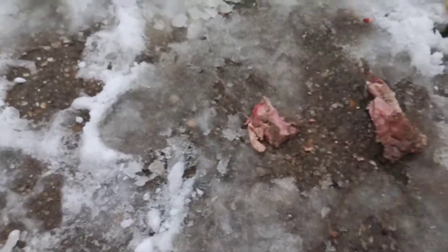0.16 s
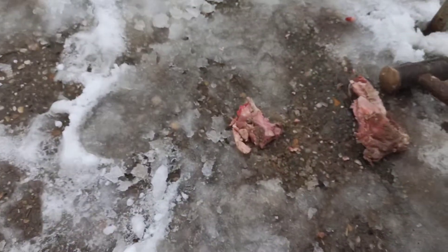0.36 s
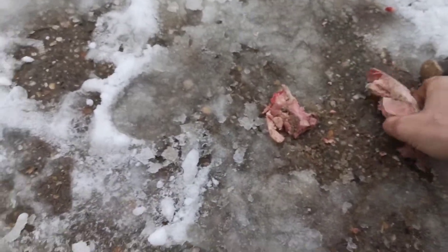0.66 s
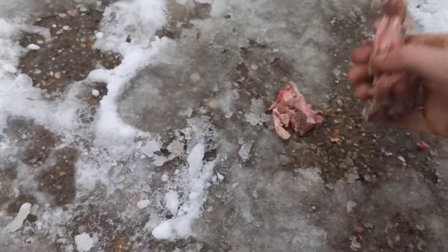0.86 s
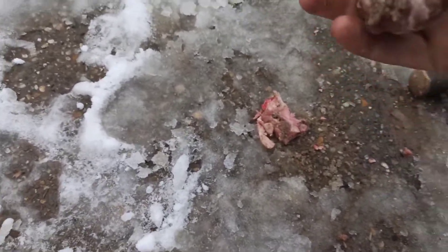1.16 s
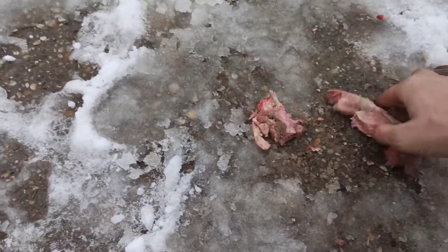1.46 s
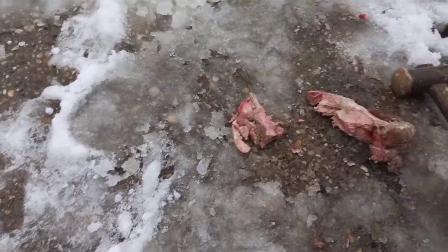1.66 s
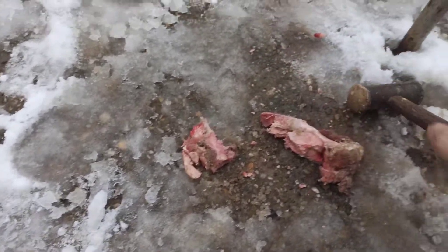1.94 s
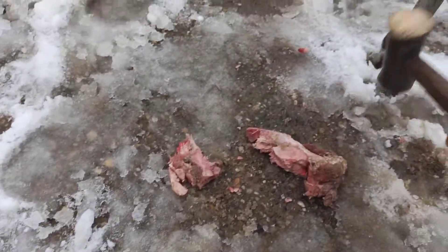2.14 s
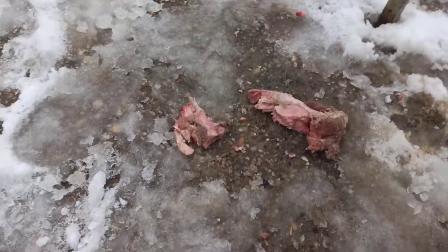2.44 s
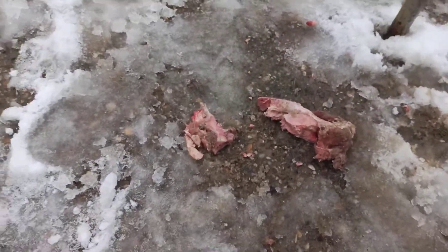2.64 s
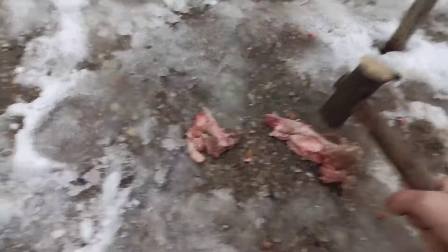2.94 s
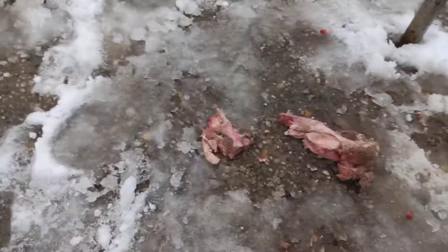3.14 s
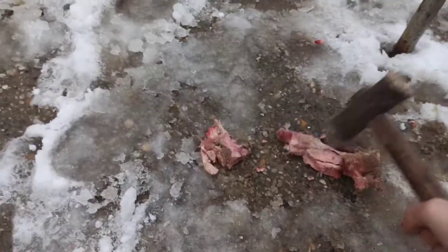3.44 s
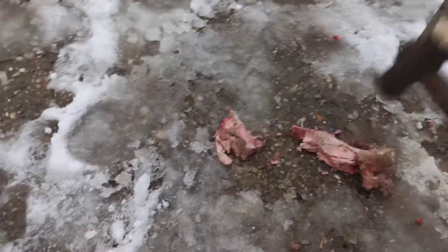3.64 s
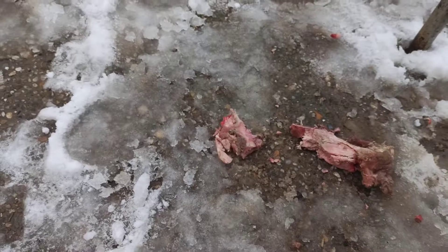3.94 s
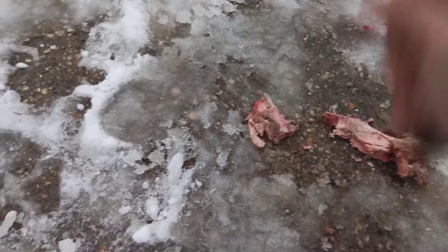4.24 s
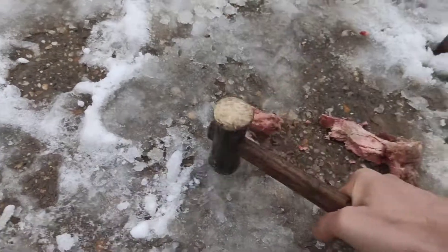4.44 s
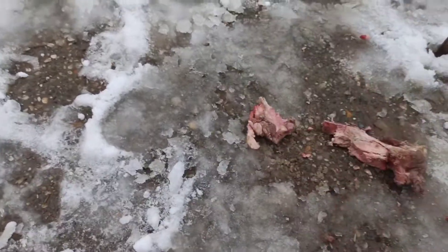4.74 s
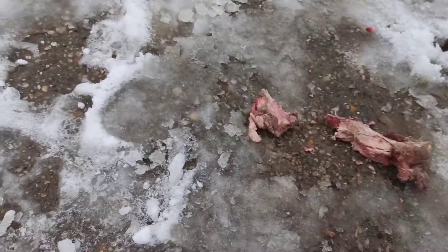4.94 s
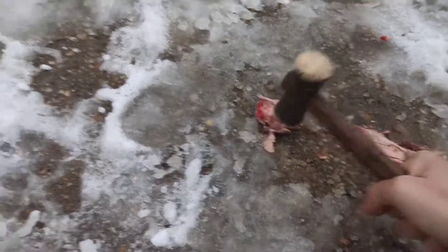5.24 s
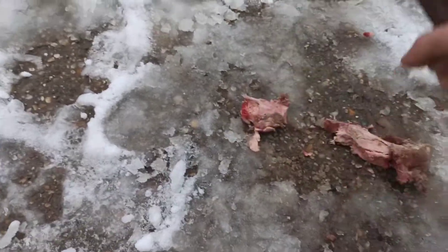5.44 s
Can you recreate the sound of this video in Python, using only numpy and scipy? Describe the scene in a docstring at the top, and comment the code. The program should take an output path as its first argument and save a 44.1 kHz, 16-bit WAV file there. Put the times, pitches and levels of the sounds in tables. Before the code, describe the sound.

Close, in a quiet open yard, a hammer is set down with a short hollow clatter on gritty ice. Light scrapes, grain ticks and cloth rustle follow as a bone is shifted. Then come four evenly spaced heavy blows, each a sharp bony crack over a low thump, with small knocks and sleeve swishes between. The microphone is near, with handling rumble and overloaded peaks.

```python
"""Meaty bones are broken with a heavy hammer on icy, gritty ground in a quiet yard.
First the hammer is put down with a clatter, made of short ringing tones, and a bone is turned over.
Then four close blows follow: noise bursts ring the bone, low swings thump the ground, loud peaks overload.
Between blows come small knocks of the resting hammer and scapes of grit, made of crackling noise.
Throughout, a sleeve swishes and handling rumbles, both shaped noise; a few faint tones sound far off."""
import sys
import numpy as np
from scipy import signal
from scipy.fft import rfft, irfft
from scipy.io import wavfile

SR = 44100
rng = np.random.default_rng(int(sys.argv[2]) if len(sys.argv) > 2 else 0)


def generate_wav(signal):
    """Clip the signal to [-1, 1] and save it as 16-bit WAV at the path in sys.argv[1]."""
    frames = np.transpose(np.atleast_2d(signal))
    scaled = np.clip(frames, -1, 1) * 32767
    pcm = np.round(scaled).astype(np.int16)
    wavfile.write(sys.argv[1], SR, pcm)


N = 246519   # length in samples
TIME = np.arange(N) / SR   # seconds from the start
AGE = np.arange(SR // 5) / SR   # seconds since a contact

# Hammer blows: start_s, crack_db, crush_s (time spent crushing), piece main_hz, piece second_hz, piece_db,
# ground thump_db, flesh slap_db, slap_hz, hammer head clack_db, clack_hz, flying crumbs_db, lifting sleeve_db
HAMMER_BLOWS = [(2.7843, -10, .0026, 3210, 6800, 2, -5, -12, 401, -11.5, 636, -55, -49.5),
                (3.438, -7, 0.0041, 2330, 6920, -4.5, -4.5, -15.5, 402, -40, 1018, -45.5, -53),
                (4.3346, -11.5, 0.0017, 4510, 6100, 0.5, -7.5, -17.5, 377, -11, 803, -59, -48.5),
                (5.0689, -6.5, 0.0028, 4360, 3530, 1.5, -7.5, -57, 295, -17, 900, -39.5, -49)]
# Notes that a cracking bone rings with: pitch_hz, width_hz, level_db
BONE_MODES = [(900, 180, 2), (1374, 200, 1.5), (1710, 250, -2.5), (2417, 350, 4.5), (2850, 140, -14),
              (3324, 300, 3), (3940, 480, -3), (4695, 170, 2), (5343, 190, -22), (5870, 200, -4.5),
              (6430, 270, 0), (7626, 120, 4.5), (13500, 3100, -39)]
# Knocks of hammer and bone on the ground: start_s, ring_db, ring_hz, thud_db (before a 4.5 dB cut),
# tick_db, wooden handle_db
GROUND_KNOCKS = [(0.2984, -27, 950, -19, -13.5, -32), (.309, -26.5, 1660, -42, -13, -35),
                 (0.3163, -1, 1054, -14, -17.5, -27), (0.3975, -37, 660, -30.5, -45, -60),
                 (0.4663, -9.5, 1200, -39.5, -17.5, -59), (0.7743, -43, 900, -38.5, -44, -56),
                 (1.1452, -31.5, 690, -33.5, -32.5, -36.5), (1.195, -33.5, 323, -36, -28, -43),
                 (1.2432, -24.5, 349, -60, -33.5, -45), (1.5403, -39, 348, -36.5, -44.5, -68),
                 (1.674, -48, 580, -42, -41.5, -43), (1.777, -40.5, 586, -42.5, -45.5, -39.5),
                 (1.9721, -23.5, 1105, -32.5, -35, -42), (3.0719, -40, 587, -58, -44, -46),
                 (3.2883, -18, 606, -39, -36, -21.5), (3.544, -33.5, 542, -33.5, -39.5, -36.5),
                 (4.0364, -34.5, 539, -52.5, -51.5, -70.5), (4.1365, -39, 479, -54, -57.5, -70),
                 (4.4454, -21, 352, -60, -30, -21), (4.9895, -40.5, 510, -49, -60, -52),
                 (5.452, -29, 310, -69, -35.5, -21)]
# Notes that a knocked piece rings with: multiple of the ring pitch (no unit), level_db
HOLLOW_MODES = [(.58, -5.5), (.8, -2), (1, 5), (1.3, -5), (1.75, -3.5), (2.5, -20)]
# Snaps of grit and ice: start_s, level_db (peak, before a 5 dB lift), centre_hz
GRAIN_SNAPS = [(0.0633, -36, 7100), (0.3076, -9, 5950), (.4685, -23.5, 13000), (0.627, -27, 2700),
               (.7527, -37, 5800), (1.0495, -29, 2400), (1.0545, -39, 3000), (1.0854, -25.5, 2720),
               (1.094, -39, 2940), (1.481, -29, 6940), (1.685, -26.5, 2500), (1.7036, -25.5, 6160),
               (1.719, -38.5, 3860), (2.0155, -26.5, 8000), (3.003, -37, 9050), (3.419, -30, 8980),
               (3.889, -39, 6840), (4.634, -27.5, 5500), (5.136, -29, 2980), (5.155, -37, 5000),
               (5.292, -27.5, 12400)]
# Scrapes over the gritty ice: start_s, length_s, level_db, centre_hz
ICE_SCRAPES = [(.336, .013, -35.5, 6500), (0.347, 0.024, -47, 1510), (0.469, .02, -39.5, 2480),
               (0.723, 0.024, -58.5, 800), (0.778, 0.019, -45.5, 786), (1.08, 0.022, -45, 1050),
               (1.202, 0.082, -53, 900), (1.41, 0.082, -48.5, 603), (1.682, .03, -52.5, 1000),
               (1.694, 0.052, -39, 5840), (1.887, 0.12, -50, 6500), (1.957, 0.023, -36.5, 920),
               (1.984, 0.047, -43, 6030), (2.006, .033, -36.5, 7000), (2.283, 0.013, -44, 746),
               (2.732, 0.02, -45, 500), (3.299, .041, -48.5, 650), (3.889, .015, -51.5, 591),
               (4.18, 0.036, -51, 665), (5.387, 0.014, -53.5, 900)]
# Single echoes from walls and fences: delay_s, level_db, favoured pitch_hz
WALL_ECHOES = [(.022, -18.5, 325.6), (.036, -18.5, 399), (.059, -20, 312), (.102, -29.5, 159.3),
               (.125, -41.5, 145), (.205, -28.5, 133)]
# Reaches of the arm, each a smooth swell of the sleeve: fastest_s (moment of the peak), width_s, level_db
ARM_REACHES = [(0.219, 0.39, -50.5), (.56, 0.03, -59), (.79, 0.017, -67), (1.4, 0.16, -53.5),
               (2.2, 0.092, -45), (2.51, 0.036, -49.5), (3.081, 0.069, -59), (3.35, 0.12, -53.5),
               (4.8, 0.1, -56.5), (5.44, 0.12, -54.5)]
# Soft low bumps and rubs of handling: start_s, length_s, level_db, start pitch_hz
HANDLING_RUBS = [(1.085, 0.093, -43.5, 123.6), (1.51, .075, -44.5, 143), (1.665, 0.0234, -39.5, 200),
                 (1.732, 0.072, -41.5, 118), (3.902, .031, -40, 135), (4.214, 0.022, -39, 153),
                 (4.872, .1, -40.5, 135.6), (4.98, 0.057, -43.5, 123.3)]
# Faint far-off tones: start_s, length_s, level_db, start pitch_hz, end pitch_hz
FAR_TONES = [(.005, 0.16, -69, 324, 317), (.38, 0.13, -51, 477, 465), (.46, 0.35, -55, 320.5, 311.7),
             (2.14, 0.17, -50.5, 332.5, 281)]
# Colour of dragged or scattered grit: pitch_hz, level_db
GRIT_COLOUR = [(60, -10), (200, 15), (700, 3.5), (1500, -1), (2500, -8), (4200, -8.5), (5400, -8),
               (7000, -3.5), (12000, -15.5), (16000, -11)]
# Colour of the swishing cloth and the hiss before a blow: pitch_hz, level_db
SLEEVE_COLOUR = [(500, 0.5), (1200, -4), (2400, -2), (3300, -2.5), (4500, 3.5), (5400, -13.5), (6400, 2),
                 (7500, 2), (8500, -13.5), (12000, -12), (16000, -6)]
# Colour of the handling rumble and the buffeted air: pitch_hz, level_db
RUMBLE_COLOUR = [(25, -28.5), (50, 0.5), (100, 1), (170, -3), (330, -5), (560, -3.5), (900, -16),
                 (1400, -14.5), (2500, -18), (6000, -46)]
# Colour of the soft echo tail: pitch_hz, level_db
ECHO_COLOUR = [(40, -14), (100, 2.5), (170, -4.5), (270, -12), (370, -10), (550, -13.5), (900, -21.5),
               (3000, -7.5), (7000, -12), (16000, -21)]
# How alike noise is on the two sides: pitch_hz, correlation (1 the same, -1 opposite; no unit)
SIDE_LIKENESS = [(60, -0.36), (300, 0.89), (640, 0.1), (1400, -0.13), (3000, 0.0077), (16000, -0.2)]


def blows():
    """A short soft hiss swells up to each blow; it crushes bone and thumps the ground, then crumbs fly."""
    hiss_db, hiss_s = -26, 0.011   # level of the hiss and how fast it swells
    gust_db, gust_width_s = -11, 0.0098   # air pushed aside by the head; level relative to the thump
    crumbs_after_s, crumbs_fly_s, crumbs_ring_db = 0.011, 0.1, -11.5   # ring relative to the crumbs
    late_s = [0.0026, 0.0028]   # the left port hears the ground first
    out = np.zeros((2, N))
    for (s, crack_db, crush_s, main_hz, second_hz, piece_db, thump_db,
         slap_db, slap_hz, clack_db, clack_hz, crumbs_db, _) in HAMMER_BLOWS:
        # the hiss is loudest at the blow
        hiss = noise(SLEEVE_COLOUR, len(AGE)) * np.exp(-AGE[::-1] / hiss_s)
        add(out, s - AGE[-1], from_db(hiss_db) * hiss)

        gust_shape = np.exp(-0.5 * ((AGE - AGE.mean()) / gust_width_s) ** 2)
        gust = noise(RUMBLE_COLOUR, len(AGE), centre_hz=30.2, spread=0.65) * gust_shape
        add(out, s - AGE.mean(), from_db(thump_db + gust_db) * gust)

        crushing = crushing_shape(crush_s)
        piece = broken_piece(crushing, main_hz, second_hz)
        crack = fracture(crushing, dry_db=-3) + from_db(piece_db) * piece
        add(out, s, from_db(crack_db) * crack)

        ground = thump(190, 0.00215, late_s) + from_db(-5.5) * thump(261, 0.0024, late_s)
        slap = thump(slap_hz, 0.0036, late_s)
        clack = thump(clack_hz, 0.001, [0.0004, 0.0005])
        add(out, s, from_db(thump_db) * ground + from_db(slap_db) * slap + from_db(clack_db) * clack)

        # the shower of crumbs rings like the piece it came from
        crumbs = from_db(crumbs_db) * crackle(crumbs_fly_s, main_hz) * flutter(340, 5.6, len(AGE))
        crumbs_ring = from_db(crumbs_ring_db) * resonate(crumbs, main_hz, 1200)
        add(out, s + crumbs_after_s, crumbs + crumbs_ring)
    return out


def crushing_shape(crush_s):
    """The crack builds up, holds while the bone is crushed, then falls away over a weaker, slower fade."""
    build_up = 1 - np.exp(-AGE / 0.0013)
    release = np.minimum(1, np.exp(-(AGE - crush_s) / 0.0017))
    return build_up * release + from_db(-4) * fade(0.025)


def broken_piece(crushing, main_hz, second_hz):
    """The piece that breaks off rings with two modes of its own."""
    breaks = rng.standard_normal((2, len(AGE))) * crushing
    main = carrying(resonate(breaks, main_hz, 460), crushing)
    second = carrying(resonate(breaks, second_hz, 470), crushing)
    return main + from_db(-9.5) * second


def fracture(envelope, dry_db):
    """A burst of tiny breaks rings the bone; each mode takes energy in proportion to its width."""
    breaks = rng.standard_normal((2, len(AGE))) * envelope

    def mode(hz, width_hz):
        """One ringing note of the bone; a wider one takes more energy."""
        return np.sqrt(width_hz) * rms_one(resonate(breaks, hz, width_hz))

    rung = np.zeros((2, len(AGE)))
    for k, (hz, width_hz, db) in enumerate(BONE_MODES):
        rung += (-1) ** k * from_db(db) * mode(hz, width_hz)   # neighbours have opposite signs
    dry_crunch = from_db(dry_db) * mode(1600, 3800)   # so wide that it hardly rings
    return carrying(rung + dry_crunch, envelope)


def thump(hz, swell_s, late_s):
    """Something struck gives under a load and swings back, dying away quickly."""
    t = np.maximum(AGE - np.array(late_s)[:, None], 0)
    swell = t / swell_s * np.exp(1 - t / swell_s)   # reaches 1 after swell_s
    return np.sin(2 * np.pi * hz * t) * swell


def knocks():
    """Each contact has a gritty tick, a short hollow ring, a thud and the handle's note; the right leads."""
    left_late_s, late_slope = 0.00031, 0.35   # lag of the left at 1 kHz; power by which it grows in the bass
    ring_cycles = 15.35   # cycles to fall by 60 dB, so low knocks ring longer
    handle_hz, handle_t60_s, tick_t60_s = 888, 0.041, 0.031
    out = np.zeros((2, N))
    for s, ring_db, ring_hz, thud_db, tick_db, handle_db in GROUND_KNOCKS:
        late_s = left_late_s * (1000 / ring_hz) ** late_slope
        t = np.maximum(AGE - np.array([[late_s], [0]]), 0)

        hollow = np.zeros((2, len(AGE)))
        for k, (multiple, db) in enumerate(HOLLOW_MODES):
            hollow += (-1) ** k * from_db(db) * np.sin(2 * np.pi * ring_hz * multiple * t)
        ring = from_db(ring_db) * hollow * fade(ring_cycles / ring_hz)
        handle = from_db(handle_db) * np.sin(2 * np.pi * handle_hz * t) * fade(handle_t60_s)
        ringing = (ring + handle) * (1 - np.exp(-t / 0.00046))   # soften the very start

        thud = thump(210, 0.0029, [late_s, 0]) + from_db(3) * thump(449, 0.0014, [late_s, 0])
        tick = fracture(fade(tick_t60_s), dry_db=-5.5)
        add(out, s, ringing + from_db(thud_db - 4.5) * thud + from_db(tick_db) * tick)
    return out


def grit():
    """Single grains snap as short ringing bursts; hammer and bone scrape over the ice."""
    out = np.zeros((2, N))
    for s, db, hz in GRAIN_SNAPS:
        burst = rng.standard_normal((2, len(AGE))) * (fade(0.0058) + from_db(-20.5) * fade(0.046))
        snap = resonate(resonate(burst, hz, 0.84 * hz), hz, 0.84 * hz)
        add(out, s, from_db(db + 5) * snap / np.abs(snap).max())
    for s, length_s, db, centre_hz in ICE_SCRAPES:
        add(out, s, from_db(db) * crackle(length_s, centre_hz))
    return out


def crackle(length_s, centre_hz):
    """Dragged or scattered grains crackle in clumps: quick attack, hold, release."""
    attack = np.clip(AGE / 0.0013, 0, 1)
    release = np.minimum(1, np.exp(-(AGE / length_s - 0.75) / 0.33))
    spread_octaves = 0.96 * (centre_hz / 1000) ** 0.26   # brighter scrapes are wider
    grains = noise(GRIT_COLOUR, len(AGE), centre_hz, spread_octaves)
    clumps = flutter(900, 3.2, len(AGE)) * flutter(120, 2.8, len(AGE))
    return attack * release * grains * clumps


def yard(x):
    """Walls and fences send back a few dull echoes inside a soft tail."""
    source = x.mean(axis=0)
    t = TIME[:SR // 2]
    decay = np.exp(-t / 0.04) + from_db(-12) * np.exp(-t / 0.15)
    tail = noise(ECHO_COLOUR, len(t)) * np.clip(t / 0.028, 0, 1) * decay
    out = from_db(-57.5) * signal.fftconvolve(source[None], tail, axes=1)[:, :N]
    for delay_s, db, hz in WALL_ECHOES:
        echo = resonate(resonate(source, hz, 0.5 * hz), hz, 0.5 * hz)
        add(out, delay_s, from_db(db) * echo)
    return out


def from_ground(x):
    """Sound from below reaches the left port with a full middle, the right with less middle, more sparkle."""
    middle = np.array([[0.35], [-0.45]]) * resonate(x, 1200, 1400)
    sparkle = np.array([[-0.15], [0.15]]) * resonate(x, 9400, 2500)
    return x + middle + sparkle


def movement():
    """Jacket cloth swishes with the arm, which also stirs loose grains, over rubs and rumble of handling."""
    rumble_db = -54.5   # handling and open air
    rub_fall = 0.62   # a rub slows down and ends at this share of its start pitch
    sleeve_db = arm_db()
    cloth = noise(SLEEVE_COLOUR, N) * flutter(370, 0.94, N) * flutter(27, 0.93, N)
    sleeve = from_db(sleeve_db) * cloth
    rumble = from_db(rumble_db) * noise(RUMBLE_COLOUR, N) * flutter(40, 4.6, N)
    slowing = [(s, length_s, db, hz, rub_fall * hz) for s, length_s, db, hz in HANDLING_RUBS]
    rubs = glides(slowing, waver_db=5.5)
    return sleeve + rumble + loose_grains(sleeve_db, per_s=42, size_db=1) + rubs


def arm_db():
    """The sleeve gets louder with every reach and with the lift of the arm after every blow."""
    still_db = -58.5   # rustle of the jacket at rest
    lift_after_s, lift_width_s = 0.19, 0.064
    lifts = [(blow[0] + lift_after_s, lift_width_s, blow[-1]) for blow in HAMMER_BLOWS]
    power = np.full(N, from_db(still_db) ** 2)
    for s, width_s, db in list(ARM_REACHES) + lifts:
        power += from_db(db) ** 2 * np.exp(-0.5 * ((TIME - s) / width_s) ** 2)
    return 10 * np.log10(power)


def loose_grains(level_db, per_s, size_db):
    """Stray grains tick under the shifting boots as short rings, louder when the worker moves."""
    born = rng.random(N) < per_s / SR
    strength_db = 3.5 * np.minimum(rng.exponential(1, N), 4)
    clicks = born * from_db(strength_db) * rng.choice([-1, 1], N)
    pitch_number = rng.integers(0, 6, N)   # each grain gets one of six pitches
    ticks = np.zeros((2, N))
    for k, hz in enumerate(np.geomspace(600, 12000, num=6)):
        # a single click rings a resonance only weakly, most of all a low one: the last factor lifts it
        rung = resonate(clicks * (pitch_number == k), hz, 0.5 * hz) * SR / (np.pi * hz)
        ticks += rung * from_db(rng.normal(0, 1.8, (2, 1)))   # a little uneven between the sides
    return from_db(level_db + size_db) * ticks


def glides(rows, waver_db):
    """Soft tones swell, slide in pitch while wavering, and fade."""
    out = np.zeros((2, N))
    for s, length_s, db, start_hz, end_hz in rows:
        size = round(length_s * SR)
        hz = np.linspace(start_hz, end_hz, size) * flutter(73.4, waver_db, size)
        swell = np.sin(np.linspace(0, np.pi, size))
        add(out, s, from_db(db) * swell * np.sin(2 * np.pi * np.cumsum(hz) / SR))
    return out


def noise(spectrum, size, centre_hz=1000, spread=np.inf):
    """Coloured stereo noise within some octaves of a centre, as alike on both sides as the table says; rms 1."""
    octave = np.log2(np.fft.rfftfreq(size, 1 / SR) + 1)

    def along(points):
        """Read a table at every frequency, in straight lines between its points."""
        hz, value = np.array(points).T
        return np.interp(octave, np.log2(hz), value)

    alike = np.clip(along(SIDE_LIKENESS), -1, 1)
    mid, side = rfft(rng.standard_normal((2, size)))
    both = np.sqrt(1 + alike) * mid + np.sqrt(1 - alike) * side * [[1], [-1]]
    gathered = np.exp(-0.5 * ((octave - np.log2(centre_hz)) / spread) ** 2)
    return rms_one(irfft(both * from_db(along(spectrum)) * gathered, size))


def flutter(per_s, depth_db, size):
    """A gain that wanders between random values, so many per second; rms 1."""
    steps = rng.standard_normal(size)
    wander = np.interp(np.arange(size) * per_s / SR, np.arange(size), steps)
    return rms_one(from_db(depth_db * wander))


def resonate(x, hz, width_hz):
    """One resonance lets its own pitch through at about full strength and weakens the rest."""
    r = np.exp(-np.pi * width_hz / SR)
    feed_in = np.array([1, 0, -1]) * (1 - r * r) / 2
    feed_back = [1, -2 * r * np.cos(2 * np.pi * hz / SR), r * r]
    return signal.lfilter(feed_in, feed_back, x)


def carrying(x, envelope):
    """Give each side the energy of the envelope."""
    return x * np.sqrt(np.sum(envelope ** 2) / np.sum(x ** 2, axis=1, keepdims=True))


def fade(t60):
    """A contact dies away evenly, by 60 dB in t60 seconds."""
    return np.exp(-np.log(1000) * AGE / t60)


def from_db(db):
    """Turn decibels into a gain."""
    return 10 ** (np.asarray(db) / 20)


def rms_one(x):
    """Scale to an rms (average strength) of 1."""
    return x / np.sqrt(np.mean(x ** 2) + 1e-20)


def add(out, s, sound):
    """Mix a short sound in at time s, in seconds."""
    start = round(s * SR)
    out[:, start:start + sound.shape[-1]] += sound[..., :N - start]


def scene():
    """All contacts and their echo, the worker's movement and faint far-off tones."""
    contacts = blows() + knocks() + grit()
    return from_ground(contacts + yard(contacts)) + movement() + glides(FAR_TONES, waver_db=0.14)


def record(dry):
    """Deep bass is cut and a band near 10 kHz is weak; peaks overload and the top is cut."""
    cutoff_hz = 16200
    coloured = dry + np.array([[0.1], [-0.1]]) * resonate(dry, 2840, 2300)   # left a little fuller here
    bass_cut = signal.butter(3, 80, "high", fs=SR, output="sos")
    coloured = signal.sosfilt(bass_cut, coloured)
    weak_band = signal.butter(6, [8600, 11650], "bandstop", fs=SR, output="sos")
    coloured = signal.sosfilt(weak_band, coloured)
    clipped = coloured / (1 + np.abs(coloured) ** 6) ** (1 / 6)   # peaks flatten towards 1
    top_cut = signal.ellip(10, 0.2, 80, cutoff_hz, fs=SR, output="sos")
    return signal.sosfilt(top_cut, 0.93 * clipped)


dry = scene()
out = record(dry)
generate_wav(out)
```